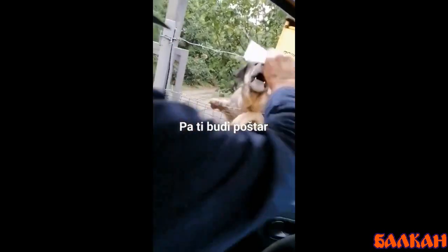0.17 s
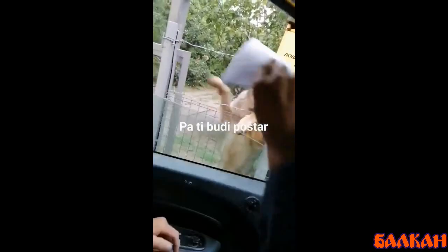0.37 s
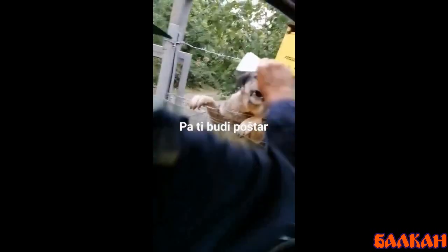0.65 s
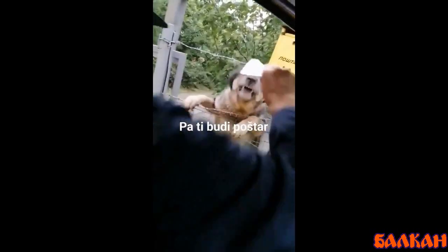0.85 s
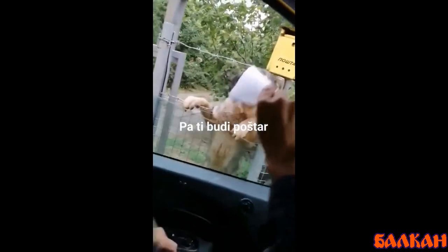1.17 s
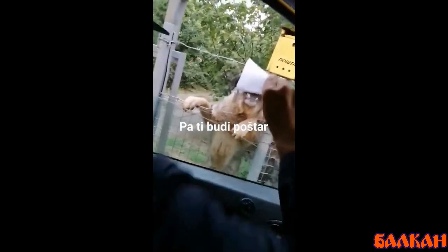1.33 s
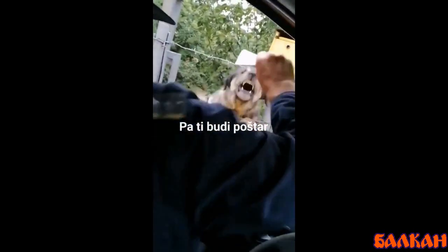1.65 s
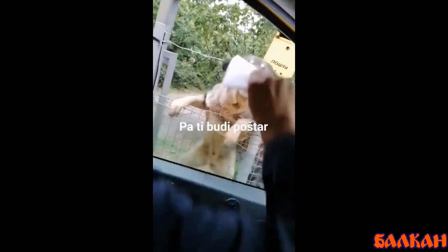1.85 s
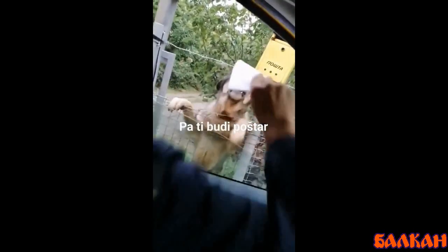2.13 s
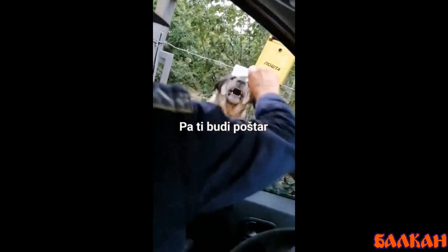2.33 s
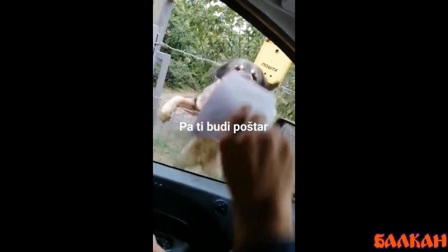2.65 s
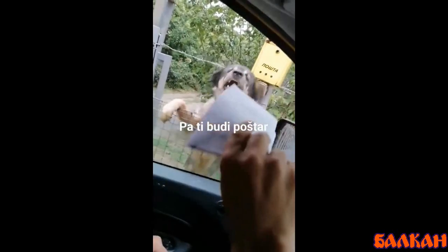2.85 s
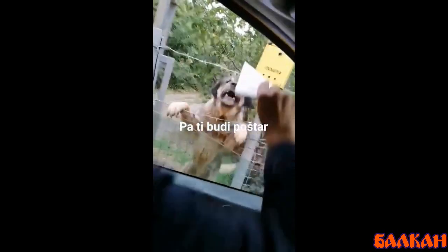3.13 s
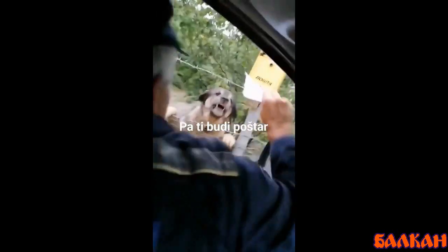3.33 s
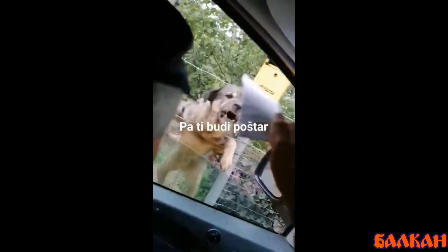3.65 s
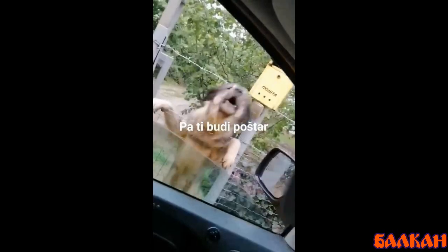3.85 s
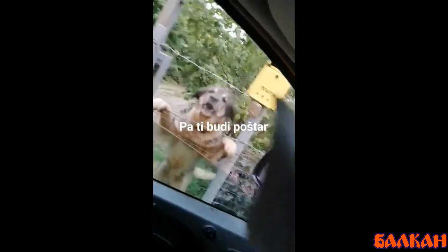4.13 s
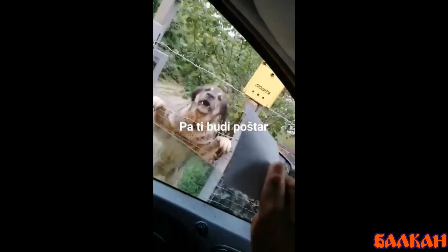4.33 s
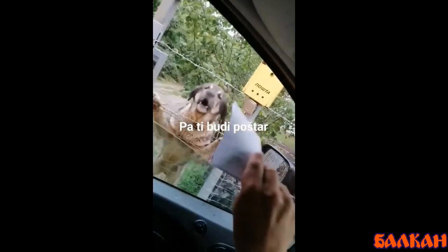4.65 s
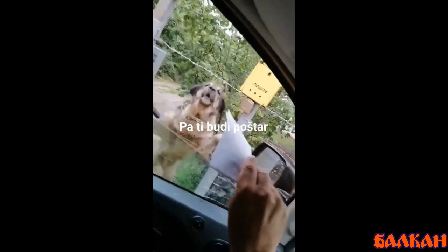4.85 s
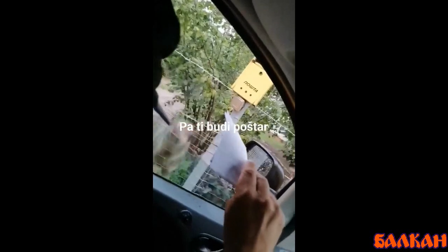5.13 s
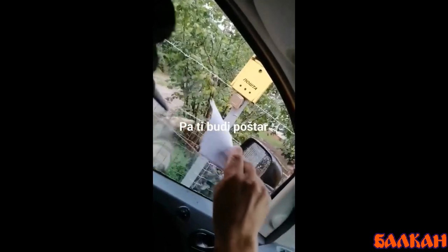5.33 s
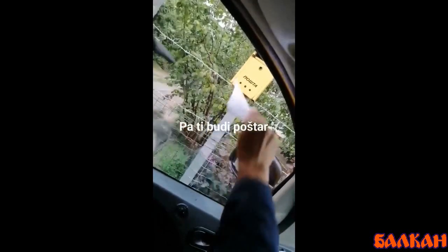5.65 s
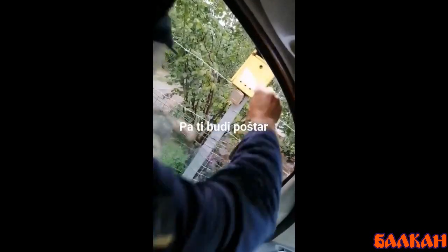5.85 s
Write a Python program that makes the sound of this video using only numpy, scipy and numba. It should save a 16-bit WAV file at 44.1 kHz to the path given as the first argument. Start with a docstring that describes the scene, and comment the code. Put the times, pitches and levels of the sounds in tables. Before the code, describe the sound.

Rattling snarls and a few loud barks come through an open car window, over a low engine hum and rustling paper.

```python
"""Inside an idling car, stereo microphone by the open side window, a large dog at the fence just outside.
Slack folds flap in its throat in long rattling snarls, air hisses through bared teeth between them,
then the folds tighten for four loud, hoarse barks. Close by, a sheet of paper rustles and someone shifts
in the seat. The engine hums below, ducked by the recorder's gain control at each bark."""
import sys
import numpy as np
from scipy import signal
from scipy.fft import rfft, irfft, next_fast_len
from scipy.io import wavfile
from scipy.ndimage import uniform_filter1d
from numba import njit

SR = 44100
rng = np.random.default_rng(int(sys.argv[2]) if len(sys.argv) > 2 else 0)


def file_out(sig):
    """Save sig as 16-bit WAV at sys.argv[1]."""
    # one column per channel
    cols = np.atleast_2d(sig).T
    # limit, then scale
    lim = np.clip(cols, -1, 1)
    pcm = np.round(lim * 32767).astype(np.int16)
    wavfile.write(sys.argv[1], SR, pcm)


N = 263718
TIME = np.arange(N) / SR
MOUTH_FOLLOWS = 0.47   # share of the throat's tuning that the mouth follows
# resonances of the dog's bared teeth: (centre [Hz], width [Hz], gain [dB])
BARED_TEETH = [(5370, 420, 1), (6900, 850, -2), (8150, 750, 0), (9700, 1170, -4.5)]


def from_db(db):
    """Decibels to amplitude."""
    return 10 ** (np.asarray(db) / 20)


def rms_one(x):
    """Scale to rms 1."""
    return x / np.sqrt(np.mean(x ** 2) + 1e-20)


def evened(x, window_s=0.035):
    """Hold the level at rms 1 and keep the fast rattle."""
    size = int(window_s * SR)
    return x / np.sqrt(uniform_filter1d(uniform_filter1d(x * x, size), size // 2) + 1e-12)


def in_time(rows):
    """A curve of (time [s], value) rows at every sample."""
    return np.interp(TIME, *np.transpose(rows))


def butter(x, hz, kind, order=2):
    """Low-, high- or band-pass filter."""
    return signal.sosfilt(signal.butter(order, hz, kind, fs=SR, output="sos"), x)


def drift(hz):
    """Random wander with spread 1, mostly slower than hz."""
    step = 20
    noise = rng.standard_normal((N + SR) // step)
    slow = butter(noise, hz * step, "low")[SR // step:]
    return np.interp(np.arange(N) / step, np.arange(len(slow)), rms_one(slow))


def coloured(x, gains, lags=((1, 0), (SR, 0))):
    """Shape a sound by a (frequency [Hz], gain [dB]) curve; delay it by (frequency [Hz], lag [rad])."""
    size = next_fast_len(N + 4096)
    log_hz = np.log(np.maximum(np.arange(size // 2 + 1) * SR / size, 1))
    db, lag = [np.interp(log_hz, np.log(curve[:, 0]), curve[:, 1]) for curve in map(np.array, (gains, lags))]
    return irfft(rfft(x, size) * from_db(db) * np.exp(-1j * lag), size)[:N]


def envelope(start, length, attack_s, release_db_per_s):
    """Smooth attack, hold until the length is over, then an even fall in dB."""
    rise = np.sin(np.pi / 2 * np.clip((TIME - start) / attack_s, 0, 1)) ** 2
    return rise * from_db(-np.clip(release_db_per_s * (TIME - start - length), 0, 200))


def strikes(rows):
    """Clicks from (time [s], level [dB]) rows."""
    clicks = np.zeros(N)
    for s, db in rows:
        clicks[int(s * SR)] += from_db(db)
    return clicks


def puffs(clicks, decay_s):
    """Each click opens a puff that dies away."""
    return signal.lfilter([1], [1, -np.exp(-1 / (decay_s * SR))], clicks + 1e-18)


@njit
def resonance(x, turn, r):
    """One two-pole resonance of pole radius r whose centre (turn, radians a sample) moves."""
    y = np.zeros(len(x))
    for i in range(2, len(x)):
        feedback = 2 * r * np.cos(turn[i]) * y[i - 1] - r * r * y[i - 2]
        y[i] = (1 - r * r) / 2 * (x[i] - x[i - 2]) + feedback
    return y


def resonate(x, modes, wander=0.034, patchy_db=2.0, semitones=0):
    """Parallel resonances that shift as tongue and jaw move, with dark flanks outside the group."""
    out = 0
    for k, (hz, width, db) in enumerate(modes):
        turn = 2 * np.pi * hz * 2 ** (semitones / 12) * (1 + wander * drift(7)) / SR
        gain = (-1) ** k * from_db(db + patchy_db * drift(7.2))
        out = out + gain * resonance(x, turn, np.exp(-np.pi * width / SR))
    return butter(out, [0.71 * modes[0][0], 1.45 * modes[-1][0]], "band")


def car(firing_hz=32.75, hum_db=-41.5, rumble_db=-41, width=0.41, uneven_db=2.2):
    """The idling engine booms unevenly around the microphone over a rumble; both swell as someone shifts."""
    # someone shifts in the seat and the cabin booms: (start [s], length [s], rumble swell [dB])
    shifts = [(0.0, 0.3, 6), (0.675, 0.52, 7), (1.98, 0.97, 5), (3.5, 0.25, 6.5), (4.508, 0.4, 7),
              (5.502, 0.45, 1.5)]
    # engine harmonics: (multiple of the firing rate, relative level [dB])
    engine_orders = [(1, 4.5), (2, -17.5), (3, -6)]
    # spectrum of the cabin rumble: (frequency [Hz], gain [dB])
    rumble_colour = [(25, -17), (50, 1), (75, 4), (110, 1), (160, 2), (240, -14), (400, -12.5),
                     (900, -44.5)]
    swell_db = sum(db * envelope(start, length, 0.016, 208) for start, length, db in shifts)
    phase = 2 * np.pi * np.cumsum(firing_hz * (1 + 0.02 * drift(4.8))) / SR
    harmonics = sum(from_db(db) * np.sin(k * phase) for k, db in engine_orders)
    hum = np.sqrt(2) * from_db(uneven_db * drift(8)) * harmonics
    mid, side = [evened(coloured(rng.standard_normal(N), rumble_colour), 0.08) for _ in range(2)]
    rumble = mid + width * side * np.array([[1], [-1]])
    return from_db(hum_db + 0.98 * swell_db) * hum + from_db(rumble_db + swell_db) * rumble


def paper(handling_db=-50, handling_s=4.6, crackle_db=-9, grain_db=5):
    """A sheet of paper near the microphone: faint handling, grainy slides and short, bright crackles."""
    # the sheet is waved and slides: (start [s], attack [s], length [s], level [dB])
    slides = [(0.023, 0.2, 0.21, -40.5), (1.36, 0.05, 0.11, -38.5), (2.894, 0.036, 0.23, -27.5),
              (4.26, 0.053, 0.18, -39)]
    # spectrum of the rustle: (frequency [Hz], gain [dB])
    rustle_colour = [(350, -75.5), (600, -8.5), (1180, -5.5), (1420, -10), (1540, -9), (2150, -7),
                     (3600, -18), (3790, -52), (4030, -23.5), (5800, -12), (12000, -10.5), (15600, -58),
                     (22000, -120)]
    # crackles of the sheet: (time [s], relative level [dB])
    crackles = [(0.15, -28), (2.6813, -9), (3.3424, -14.5), (4.5945, -12.5)]
    sliding = sum(from_db(db) * envelope(start, length, attack_s, release_db_per_s=86)
                  for start, attack_s, length, db in slides)
    handling = from_db(handling_db) * envelope(0, handling_s, 0.02, release_db_per_s=3.5)
    grains = rms_one(coloured(rng.standard_normal(N) * from_db(grain_db * drift(210)), rustle_colour))
    snaps = from_db(crackle_db) * butter(puffs(strikes(crackles), decay_s=0.0086), 90, "low", order=1)
    return (handling + sliding) * grains + snaps * butter(grains, 2500, "high", order=1)


def jaw(start, length, arch_db):
    """Gain of the mouth as it opens and closes over one call, widest in the middle."""
    return from_db(-arch_db * np.minimum((2 * (TIME - start) / length - 1) ** 2, 2))


def effort(start, length, levels_db, attack_s, release_db_per_s):
    """Power of throat, mouth, lips and teeth over one push of breath; the air outlasts the voice."""
    voice = envelope(start, length, attack_s, release_db_per_s)
    air = envelope(start, length, attack_s, 0.76 * release_db_per_s)
    mouth = voice * jaw(start, length, arch_db=1.5)
    return (from_db(levels_db)[:, None] * [voice, mouth, air, air]) ** 2


def snarl_controls():
    """Gains of throat, mouth, lips and teeth, and the tuning that glides from push to push."""
    # pushes of the snarl: (start [s], length [s], throat tuning [semitones],
    # relative levels of throat [dB], mouth [dB], lips [dB], teeth [dB])
    growls = [(0.311, 0.19, 0.9, -19.5, -25, -32.5, -36), (0.447, 0.097, 1.3, -21.5, -23.5, -31, -34),
              (0.564, 0.14, -1.4, -23.5, -31.5, -37, -38), (0.712, 0.24, -2, -27, -32.5, -41, -45.5),
              (0.915, 0.11, 1, -18.5, -18, -30.5, -33), (1.039, 0.12, 0.1, -19.5, -21.5, -28.5, -31),
              (1.156, 0.06, 0.5, -16, -18.5, -29, -31.5), (1.737, 0.18, 0.5, -29.5, -30.5, -37, -40),
              (1.797, 0.15, 1.5, -22, -24, -32.5, -31), (1.964, 0.12, 0, -22.5, -29.5, -34, -38),
              (2.074, 0.22, 0, -18.5, -25.5, -29, -32.5), (2.278, 0.12, -0.5, -17, -21, -28, -27),
              (2.398, 0.203, -0.6, -23, -30, -41.5, -40.5), (2.555, 0.086, 1.5, -16, -15, -30, -26.5),
              (2.64, 0.19, 0.5, -24, -30.5, -30, -29.5), (3.391, 0.31, 0.8, -35.5, -46.5, -52, -53),
              (3.61, 0.32, 0.3, -13, -20.5, -28, -27.5), (4.276, 0.17, -0.5, -31, -53, -54, -53),
              (4.714, 0.18, -3, -28, -42, -47, -61), (4.785, 0.07, -3, -21, -38, -48, -60),
              (5.354, 0.25, -2.5, -32.5, -56, -64, -63), (5.57, 0.07, -2, -24, -42, -52, -58),
              (5.76, 0.1, -3, -35, -53, -58, -62)]
    # hissing rasps through bared teeth: (start [s], length [s], voice release [dB/s],
    # relative levels of throat [dB], mouth [dB], lips [dB], teeth [dB])
    rasps = [(1.207, 0.045, 278, -38, -24.5, -25, -23.5), (1.342, 0.089, 170, -30, -32.5, -30.5, -27.5),
             (2.887, 0.1, 200, -24.5, -26.5, -28, -25), (3.027, 0.15, 184, -29.5, -33, -31, -32),
             (4.061, 0.11, 326, -36, -50, -41.5, -31.5), (4.295, 0.2, 150, -43, -43, -39, -36.5),
             (5.076, 0.034, 200.5, -27.5, -61, -45.5, -39)]
    growling = sum(effort(start, length, db, attack_s=0.058, release_db_per_s=416.5)
                   for start, length, _, *db in growls)
    rasping = sum(effort(start, length, db, attack_s=0.045, release_db_per_s=release)
                  for start, length, release, *db in rasps)
    tuning = in_time(sorted((start + length / 2, semitones) for start, length, semitones, *_ in growls))
    return np.sqrt(growling + rasping), tuning


def snarl(flaps_per_s=80, throat_db=3, mouth_db=2.2, lips_db=-0.8, catch_db=31, closure=0.6):
    """Slack folds flap unevenly; each flap knocks the throat and lets a puff of air past the teeth."""
    # resonances from throat to teeth, in growl, rasp and catch: (centre [Hz], width [Hz], gain [dB])
    throat_modes = [(218, 65, -4.2), (384.7, 36, -1), (468, 56, 2.5), (538, 60, 1.5)]
    mouth_modes = [(690, 105, -1), (890, 140, 2), (1030, 100, 2), (1370, 100, -5.5)]
    rasp_modes = [(1058, 190, 0), (1440, 160, -3.5)]
    lip_modes = [(1818, 142, 1), (2040, 142, 1), (2493, 226, -1.5), (3103, 274, -5)]
    teeth_modes = [(4510, 500, -16), (5370, 340, 1.5), (6040, 810, -17), (6900, 450, -5), (8150, 420, -1),
                   (9620, 1300, -10)]
    catch_modes = [(499, 38, 0.5), (717, 180, -13.5)]
    # hard catches of the throat in a snarl or at the start of a bark: (time [s], relative level [dB])
    catches = [(0.357, -3), (0.409, -1), (0.425, -1), (0.505, 7.5), (0.536, 2), (0.595, -7), (0.646, -3),
               (0.781, -9), (0.818, -6), (0.878, -2.5), (0.987, -1), (1.017, 2), (1.066, -8), (1.137, 1.5),
               (1.205, 0), (1.829, -0.5), (2.008, -7), (2.121, -1), (2.231, 1), (2.262, -1), (2.362, -2),
               (2.401, 0), (2.609, 5), (2.912, -8), (3.420, -23), (3.492, -10.5), (3.637, -0.5), (3.726, 9),
               (3.846, 3), (3.886, 12), (4.435, -3), (4.772, -13), (4.811, -4), (4.844, -1), (5.468, -17),
               (5.627, -3)]
    (throat, mouth, lips, teeth), tuning = snarl_controls()
    gaps, sizes = rng.standard_normal((1200, 2)).T
    flap_times = np.cumsum(np.exp(0.24 * gaps)) / flaps_per_s
    flaps = strikes([(s, 2.1 * size) for s, size in zip(flap_times, sizes) if s < TIME[-1]])
    flow = puffs(flaps, decay_s=0.004) + 0.2
    breath, air = rng.standard_normal((2, N))
    knocks = 22 * flaps + flow * breath
    jet = 8 * flaps + flow * air
    rattle = evened(resonate(knocks, throat_modes, wander=0.028, patchy_db=1.5, semitones=tuning), 0.026)
    # in a hissing rasp the lips are drawn back and the lowest mouth resonances drop out
    bared = teeth ** 2 / (teeth ** 2 + mouth ** 2 + 1e-14)
    growl_vowel = np.sqrt(1 - bared) * resonate(jet, mouth_modes, semitones=MOUTH_FOLLOWS * tuning)
    rasp_vowel = np.sqrt(bared) * resonate(flow * breath, rasp_modes)
    vowel = evened(growl_vowel + rasp_vowel, 0.046)
    rasp = evened(resonate(jet + 0.4 * air, lip_modes, wander=0.016, patchy_db=3.5))
    covered_hiss = resonate((flow + 1) * breath, teeth_modes, wander=0.025, patchy_db=2.5)
    bared_hiss = resonate(air, BARED_TEETH, wander=0.02)
    hiss = evened(np.sqrt(1 - bared) * covered_hiss + bared * bared_hiss)
    # the throat closes for a moment, then bursts open in a catch
    from_closure_s = np.min([np.abs(TIME - s + 0.003) for s, _ in catches], axis=0)
    opening = 1 - closure * np.exp(-(from_closure_s / 0.008) ** 2)
    bursts = resonate(strikes(catches), catch_modes, wander=0.015, patchy_db=1.5, semitones=tuning)
    voice = from_db(throat_db) * throat * rattle + from_db(mouth_db) * mouth * vowel
    return opening * voice + from_db(lips_db) * lips * rasp + teeth * hiss + from_db(catch_db) * bursts


def smacks():
    """The dog's lips part with a short, wet spit of air."""
    # resonances of the parting lips: (centre [Hz], width [Hz], gain [dB])
    mouth_modes = [(1965, 150, 0.5), (2900, 500, -13.5)]
    # the lips part: (time [s], level [dB])
    partings = [(0.322, -30), (0.629, -28), (2.955, -24), (5.648, -14)]
    spit = evened(resonate(rng.standard_normal(N), mouth_modes, wander=0.02))
    return puffs(strikes(partings), decay_s=0.011) * spit


def thumps():
    """Soft bumps against seat and door boom briefly in the cabin."""
    # the bumps: (time [s], level [dB])
    bumps = [(0.895, -27.5), (3.42, -27.5), (3.66, -20), (3.705, -21), (4.585, -31)]
    boom = evened(butter(rng.standard_normal(N), [60, 120], "band"))
    return butter(puffs(strikes(bumps), decay_s=0.033) * boom, 180, "low")


def groans(gain_db=6, waver=0.0204):
    """A low, nearly pure note slides down under the snarl."""
    # the dog's groans: (start [s], length [s], pitch [Hz], fall [octaves/s], relative level [dB])
    notes = [(2.173, 0.045, 215.5, 4.4, -23), (3.129, 0.11, 212, 6.8, -30.5)]
    out = 0
    for start, length, hz, fall, db in notes:
        pitch = hz * 2 ** (-fall * np.clip(TIME - start, 0, 2 * length)) * (1 + waver * drift(40))
        level = from_db(db) * envelope(start, length, attack_s=0.0091, release_db_per_s=324)
        out = out + level * np.sin(2 * np.pi * np.cumsum(pitch) / SR)
    return from_db(gain_db) * out


def bark_controls(deepest_sag=0.2, rough_rise=1.9, rough_loss_db=4.5, air_fade_db=2, jaw_semitones=2.4):
    """Each bark arches in pitch, clears after a rough start and opens the jaw once."""
    # the barks: (start [s], attack [s], length [s], top pitch [Hz], top at [share of length],
    # pitch lacking at the start [share], at the end [share], clearest at [share of length],
    # roughness there [0-1], throat tuning [semitones], fundamental [dB], its fade [dB per length],
    # chest [dB], throat [dB], mouth [dB], lips [dB], teeth [dB]); levels are relative
    calls = [(3.87, 0.032, 0.18, 452.5, 0.68, .21, .045, .76, .17, 0.5, 5.5, 0.5, 3.5, -6, -9.5, -12.5, -17),
             (4.838, 0.042, 0.168, 427.7, 0.4, .14, .1, .62, .14, 0.2, -2.5, 3.5, -7, -11, -13.5, -19.5, -21.5),
             (5.165, 0.048, 0.141, 433.9, .52, .2, .11, 0.599, .23, -1, -1.5, 7.5, -7.5, -8.5, -26, -22.5, -21),
             (5.603, 0.094, 0.147, 415, 0.64, .12, .085, .72, .24, -3.2, 5.5, -1.5, 0.5, -8, -31, -26, -28.5)]
    levels, voice = np.zeros((6, N)), None
    for (start, attack_s, length, top_hz, top_at, scoop, drop, clear_at, least_rough,
         semitones, tone_db, fade_db, *layer_db) in calls:
        along = np.clip((TIME - start) / length, 0, 1.35)
        bend = np.where(along < top_at, scoop / top_at ** 2, drop / (1 - top_at) ** 2)
        pitch = top_hz * (1 - np.minimum(bend * (along - top_at) ** 2, deepest_sag))
        rough = np.clip(least_rough + rough_rise * (along - clear_at) ** 2, 0.05, 1)
        tuning = semitones - jaw_semitones * (along - 0.5) ** 2   # resonances sink as the jaw closes
        loudness = envelope(start, length, attack_s, release_db_per_s=377)
        layers = from_db([tone_db, *layer_db])[:, None] * loudness
        shift = from_db(fade_db * (along - 1))
        layers[0] *= from_db(-rough_loss_db * rough) / shift   # roughness breaks up the fundamental
        layers[2] *= np.sqrt(shift)   # the throat gains as the fundamental fades
        layers[3] *= jaw(start, length, arch_db=7)
        layers[4:] *= from_db(-air_fade_db * (along - 0.5))   # rasp and hiss are strongest early
        levels += layers
        this_voice = np.array([pitch, rough, tuning])
        voice = this_voice if voice is None else np.where(TIME >= start, this_voice, voice)
    return levels, *voice


def barks(shimmer=0.69, tripling=0.96, torn_db=2.2, tone_db=0.5, throat_db=4, mouth_db=5):
    """Taut folds give an arching note, chaotic at its ends, with every third cycle stronger."""
    # resonances of the barking dog, chest to lips: (centre [Hz], width [Hz], gain [dB])
    chest_modes = [(430, 70, -3), (500, 60, 0)]
    throat_modes = [(645, 110, -6), (740, 110, 2.5), (830, 141, -1.5), (1050, 110, -10)]
    mouth_modes = [(1235, 164, 0.5), (1500, 260, -10.5)]
    lip_modes = [(1740, 200, 0), (2024, 153, 3), (2550, 330, -3), (3100, 270, -7), (4110, 420, -12)]
    (tone, chest, throat, mouth, lips, teeth), pitch, rough, tuning = bark_controls()
    jitter = (0.008 + 0.13 * rough ** 1.3) * drift(130)
    phase = 2 * np.pi * np.cumsum(pitch * (1 + jitter)) / SR
    fundamental = evened(np.sin(phase) * (1 + (0.054 + shimmer * rough) * drift(43)), 0.034)
    overtones = sum(np.cos(k * phase) for k in range(2, 9))
    overtones *= 1 + tripling * np.cos(phase / 3 + 0.5 * drift(30))
    overtones -= 0.6 * np.cos(2 * phase)   # weak octave
    overtones *= from_db(torn_db * drift(70))
    air = rng.standard_normal(N) * (1 + 0.9 * np.cos(phase)) * from_db(3.5 * drift(120))
    source = overtones + (0.45 + 4 * rough) * air
    woof = rough ** 1.3 * evened(resonate(air, chest_modes, wander=0.02), 0.023)
    body = butter(from_db(tone_db) * tone * fundamental + chest * woof, 340, "high", order=6)
    shout = evened(resonate(source, throat_modes, wander=0.017, semitones=tuning), 0.017)
    vowel = evened(resonate(source, mouth_modes, wander=0.0064, semitones=MOUTH_FOLLOWS * tuning))
    rasp = evened(resonate(source + 1.7 * rough * air, lip_modes, wander=0.02), 0.072)
    hiss = evened(resonate(air, BARED_TEETH, wander=0.023))
    voice = body + from_db(throat_db) * throat * shout + from_db(mouth_db) * mouth * vowel
    return voice + lips * rasp + teeth * hiss


def echoes(t60):
    """A dense run of reflections that falls 60 dB in t60 seconds; energy 1."""
    age = TIME[:int(t60 * SR)]
    tail = rng.standard_normal(len(age)) * from_db(-60 * age / t60)
    return tail / np.linalg.norm(tail)


def cabin(x, scatter_hz=720, cabin_t60=0.097, yard_db=-15, yard_t60=0.34, lag_s_per_db=2.1e-5):
    """Lows reach the microphone directly; highs scatter off glass and trim; the yard adds a faint tail."""
    # the dog lunges about behind the window frame: (time [s], leftward lean of its low notes [relative])
    sway = [(0.3, 4.5), (0.66, 15), (1.44, 10.5), (1.67, -11.5), (2.2, 14), (2.64, 7.5), (2.72, 13),
            (3.42, -1.5), (3.93, 6.5), (4.45, -10.5), (4.57, -12), (4.61, -17.5), (4.87, 2.5), (5.9, -0.5)]
    # share of the sound that reaches the microphone ports directly: (frequency [Hz], gain [dB])
    direct_share = [(450, -3), (800, 0.5), (1300, -6), (2200, -4), (3600, 1), (4700, -10), (9000, -8)]
    # the window frame bends the path to the right port: (frequency [Hz], lag [rad])
    port_lag = [(100, .05), (450, 0.4), (620, 0.3), (800, 2.35), (1250, 2.51), (3600, 3.56), (7200, 3.3),
                (11000, 3.1)]
    lows = butter(x, 520, "low", order=1)
    pan_db = 1.103 * in_time(sway)
    left = coloured(x + lows * (from_db(pan_db / 2) - 1), direct_share)
    right = coloured(x + lows * (from_db(-pan_db / 2) - 1), direct_share, port_lag)
    right = np.interp(TIME - lag_s_per_db * pan_db, TIME, right)   # later as the dog moves left
    # as the head turns, the sound passes from one set of reflections to another
    aim = np.array([drift(2.44) for _ in range(3)])
    paths = butter(x, scatter_hz, "high", order=3) * aim / np.linalg.norm(aim, axis=0)
    dull = butter(x, 2700, "low", order=1)
    out = []
    for direct in (left, right):
        near = sum(signal.oaconvolve(path, echoes(cabin_t60))[:N] for path in paths)
        far = signal.oaconvolve(dull, echoes(yard_t60))[:N]
        out.append(direct + near + from_db(yard_db) * far)
    return np.array(out)


def gain_control(x, threshold_db=-23.5, squeeze=0.65, detector_s=0.012, linger_share=0.38):
    """Loud sounds pull the gain down at once; it recovers in two stages, so barks duck the engine."""
    size = int(detector_s * SR)
    power = uniform_filter1d(np.mean(x * x, axis=0), size)
    level_db = 10 * np.log10(np.abs(power) + 1e-12)
    cut_db = squeeze * np.maximum(level_db - threshold_db, 0)
    fast, slow = [np.maximum.accumulate(cut_db + db_per_s * TIME) - db_per_s * TIME
                  for db_per_s in (90.5, 11)]
    return x * from_db(-uniform_filter1d(fast + linger_share * (slow - fast), size // 2))


def scene():
    """Dog and paper sound through the cabin, over the car's own noise."""
    return cabin(snarl() + smacks() + barks() + groans() + paper()) + car() + thumps()


def record(dry):
    """Each microphone port colours the sound, the gain control rides it, and the top is cut."""
    # response of the left and right ports: (frequency [Hz], gain [dB])
    left_port = [(30, -3.5), (150, -6), (450, 1.5), (720, 0.3), (950, 2.3), (1300, 0.8), (3200, -1),
                 (3900, 3), (5300, 3), (6400, -2), (8300, 0), (10000, -10.5), (11500, -23)]
    right_port = [(30, -3), (150, -6), (450, 1), (800, 0), (3200, -1.5), (3900, 4), (5300, 4), (6400, 4),
                  (8300, -10.5), (10000, -17.5), (11500, -31)]
    ports = np.array([coloured(dry[0], left_port), coloured(dry[1], right_port)])
    top_cut = signal.ellip(10, 0.2, 90, 11300, fs=SR, output="sos")
    return signal.sosfilt(top_cut, gain_control(ports))


dry = scene()
out = record(dry)
file_out(out)
```